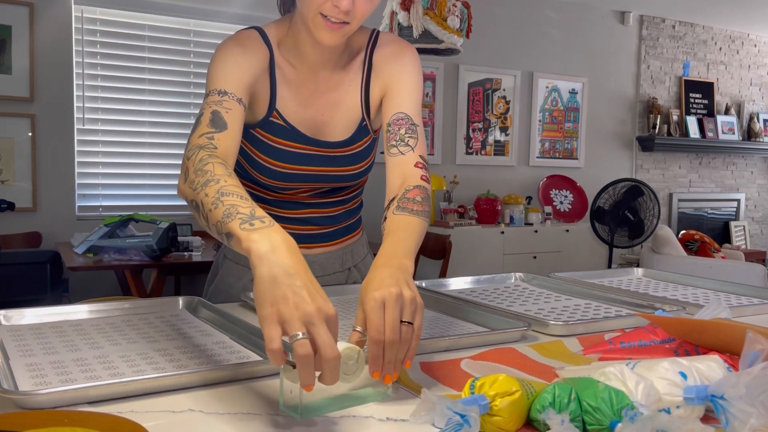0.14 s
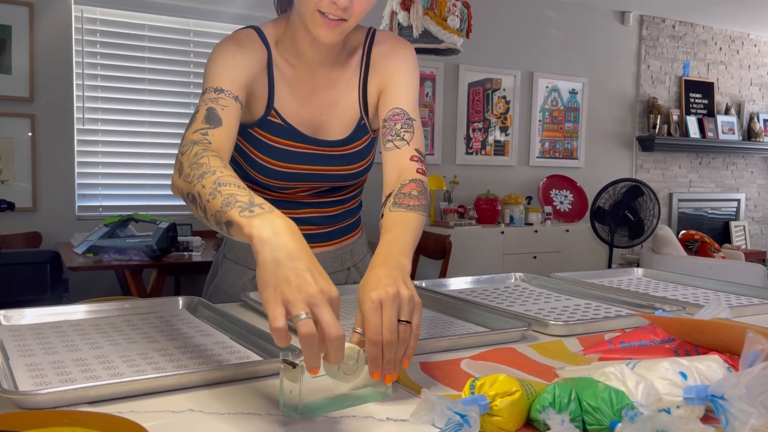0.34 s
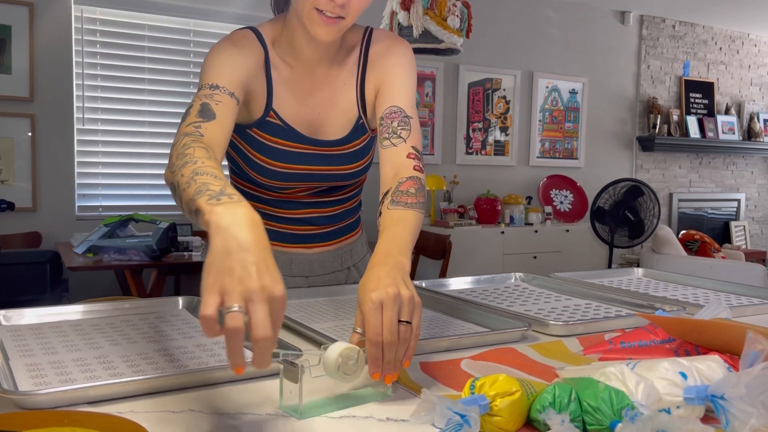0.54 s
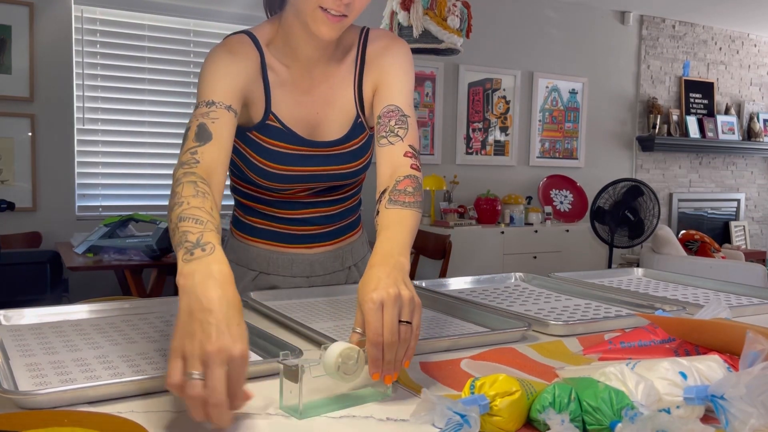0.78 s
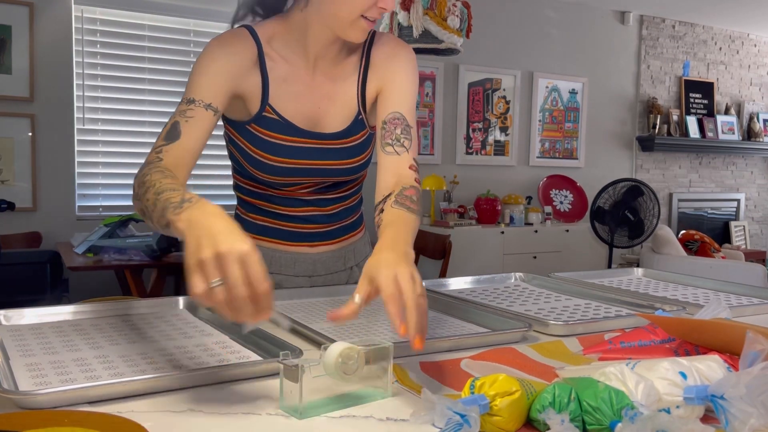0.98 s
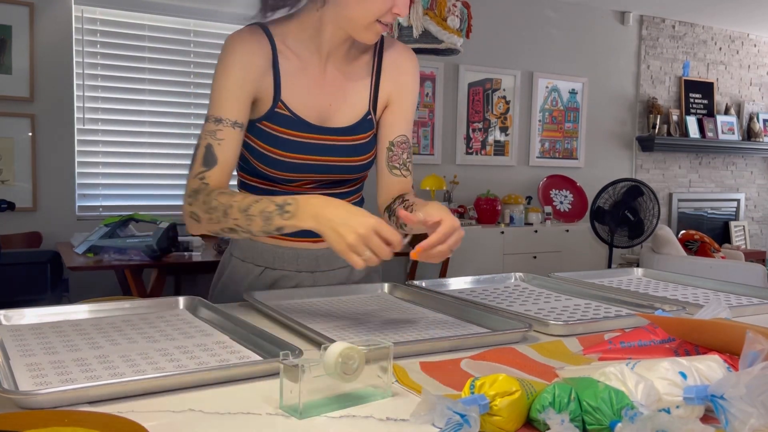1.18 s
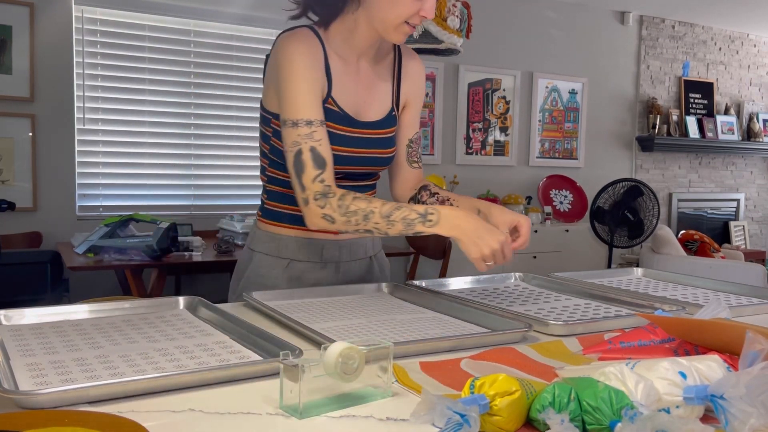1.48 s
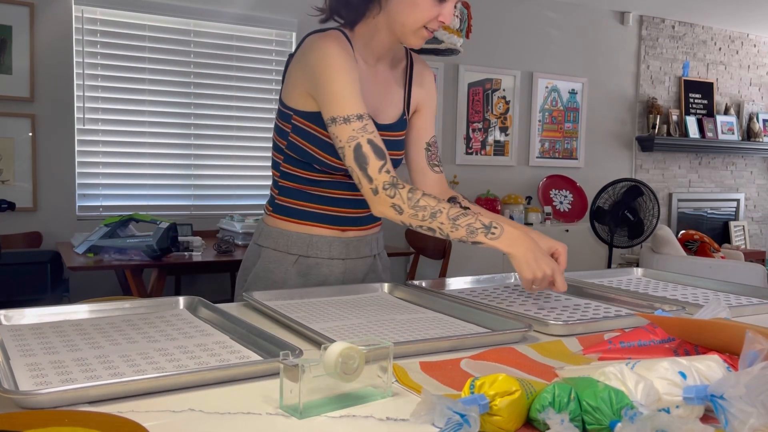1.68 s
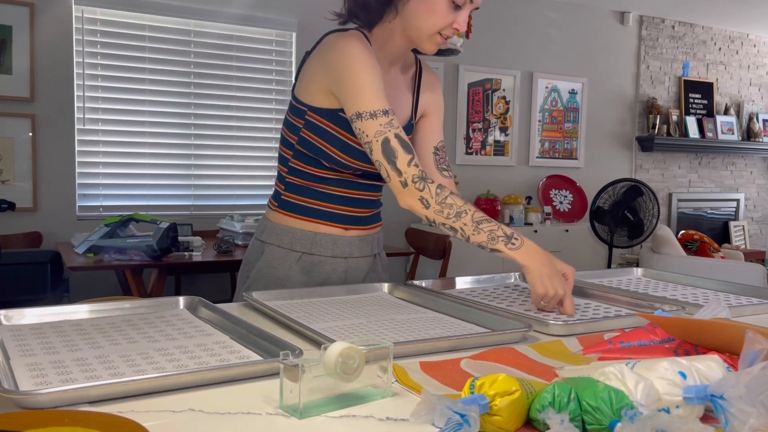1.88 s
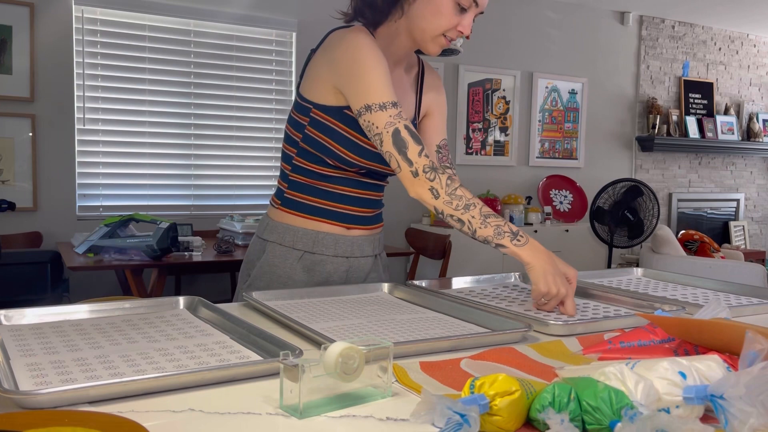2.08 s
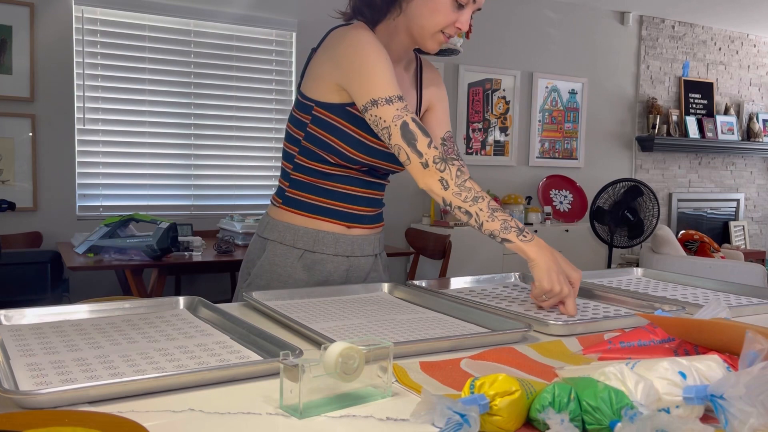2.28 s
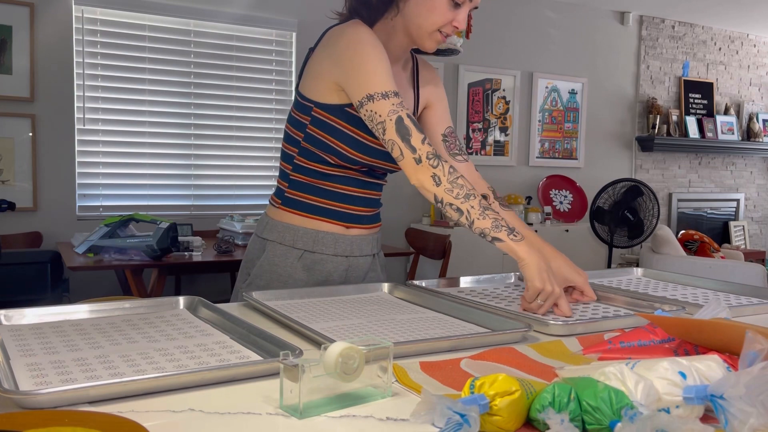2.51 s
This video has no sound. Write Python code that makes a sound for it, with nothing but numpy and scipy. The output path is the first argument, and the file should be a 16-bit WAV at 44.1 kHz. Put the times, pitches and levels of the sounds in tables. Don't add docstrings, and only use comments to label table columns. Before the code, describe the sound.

Adhesive tape is pulled from a plastic dispenser with sharp clicks and a crackly tear, then lightly handled and pressed onto metal baking sheets; a kitchen hums steadily, and nearby stereo microphones catch some room echo.

```python
import sys
import numpy as np
from scipy import signal
from scipy.fft import rfft, irfft, next_fast_len
from scipy.io import wavfile

SR = 44100
rng = np.random.default_rng(int(sys.argv[2]) if len(sys.argv) > 2 else 0)


def attenuation_scalar(level_db):
    decades = np.asarray(level_db, float) / 20
    return 10 ** decades


def transcribe(u):
    v = np.clip(np.atleast_2d(u).T, -1, 1)
    q = np.round(v * 32767).astype(np.int16)
    wavfile.write(sys.argv[1], SR, q)


N = 116865
SIZE = next_fast_len(N + SR)
HZ = np.maximum(np.arange(SIZE // 2 + 1) * SR / SIZE, 1)
AIR_LOW_HZ, AIR_HIGH_HZ = 12600, 16400


def rms_one(x):
    return x / np.sqrt(np.mean(x ** 2) + 1e-20)


def at_hz(points):
    hz, value = np.transpose(points)
    return np.interp(np.log(HZ), np.log(np.maximum(hz, 1)), value)


def ring(clicks, hz, t60_s):
    r, w = attenuation_scalar(-60 / (t60_s * SR)), 2 * np.pi * hz / SR
    return signal.lfilter([0, np.sin(w)], [1, -2 * r * np.cos(w), r * r], clicks + 1e-18)


def peak(x, hz, width_hz):
    r = np.exp(-np.pi * width_hz / SR)
    poles = [1, -2 * r * np.cos(2 * np.pi * hz / SR), r * r]
    return signal.lfilter([(1 - r * r) / 2, 0, (r * r - 1) / 2], poles, x)


def filtered(x, order, hz, kind):
    return signal.sosfilt(signal.butter(order, hz, kind, fs=SR, output="sos"), x)


def pair(alike, count):
    mid, side = rfft(rng.standard_normal((2, count)), SIZE)
    alike = np.clip(alike, 0, 1)
    return np.sqrt(1 + alike) * mid + np.sqrt(1 - alike) * side * [[1], [-1]]


def appliances():
    # f/Hz, level/dB, wander/dB
    motor_lines = [(58.9, -50.5, 1.54), (118.8, -54.5, 1), (479, -66.5, 0.5)]
    # f/Hz, width/Hz, level/dB
    ducts = [(118.3, 16, -52.5), (142.6, 7.56, -62.5), (175.3, 14, -61.5), (189.3, 5.1, -61.5),
             (250.2, 16, -62.5), (118, 23, -62.5)]
    # f/Hz, level/dB
    rumble = [(15, -35), (25, -3), (49, -6), (123, -9.5), (300, -13), (476, -15.5), (528, -16.5),
              (718, -16.5), (1500, -23), (1950, -84.5), (3300, -120)]
    # f/Hz, level/dB
    hiss = [(700, -19), (1500, 6.5), (3000, -1.5), (6000, -12), (8500, -7.5), (10000, -4.5), (11000, -33),
            (13000, -57)]
    # f/Hz, likeness/1
    likeness = [(30, 0.49), (125, 0.81), (300, 0.8), (600, 0.22), (2000, 0.265), (5000, .7), (9000, 1),
                (14000, 1)]
    rumble_db, hiss_db = -56, -69.5
    rumble_shape = attenuation_scalar(at_hz(rumble)) / (1 + (HZ / 1500) ** 2) / (1 + (44 / HZ) ** 6)
    hiss_shape = attenuation_scalar(at_hz(hiss)) / (1 + (700 / HZ) ** 2)
    shapes = [(rumble_db, rumble_shape), (hiss_db, hiss_shape)]
    shapes += [(db, 1 / (1 + (2 * (HZ - hz) / width_hz) ** 2)) for hz, width_hz, db in ducts]
    power = sum((attenuation_scalar(db) * s / np.sqrt(np.mean(s ** 2))) ** 2 for db, s in shapes)
    noise = np.sqrt(power / 2) * pair(at_hz(likeness), count=SIZE)
    t = np.arange(SIZE) / SR
    lines = 0
    for hz, db, wander_db in motor_lines:
        wander = rms_one(peak(rng.standard_normal(SIZE), 5.6, 4.6))
        lines = lines + attenuation_scalar(db + wander_db * wander) * 2 ** .5 * np.sin(2 * np.pi * hz * t)
    return noise + rfft(lines)


def kitchen(x):
    # t/s, level/dB
    echoes = [(.0015, -17), (.0024, -13), (.0036, -14.5), (.0055, -12.5)]
    # f/Hz, t60/s
    room_t60 = [(400, 0.38), (1500, 0.41), (4000, 0.39), (9000, 0.36), (11500, 0.083)]
    # f/Hz, likeness/1
    room_alike = [(400, .2), (2000, .3), (5000, .3), (8000, .75), (10000, .9)]
    away_s, away_wet_db = 1.19, 5.5
    onset_s, top_hz = 0.0006, 10900
    room_db, low_db, turn_hz = -6.5, -2.5, 3020
    noise = irfft(pair(at_hz(room_alike), count=N), SIZE)[:, :N]
    hz, t60_s = np.transpose(room_t60)
    fed = x * attenuation_scalar(away_wet_db * (np.arange(N) > away_s * SR))
    rise = np.exp(-1 / (onset_s * SR))
    tail = 0
    for k, low in enumerate(250 * 2 ** np.arange(0, 5.6, 1 / 3)):
        band = [low, low * 2 ** (1 / 3)]
        drain = attenuation_scalar(-120 / (SR * np.interp(np.log(low), np.log(hz), t60_s)))
        poles = np.convolve([1, -drain], [1, -rise])
        energy = signal.lfilter([(1 - drain) * (1 - rise)], poles, filtered(fed, 2, band, "band") ** 2 + 1e-18)
        tail = tail + (-1) ** k * np.sqrt(np.abs(energy)) * rms_one(filtered(noise, 2, band, "band"))
    near = 1 + sum(attenuation_scalar(db) * np.exp(-2j * np.pi * HZ * s) for s, db in echoes)
    wet = attenuation_scalar(room_db + low_db / (1 + (HZ / turn_hz) ** 2)) / np.sqrt(1 + (HZ / top_hz) ** 44)
    return near * rfft(x, SIZE) + wet * rfft(tail, SIZE)


def rips():
    # t/s, level/dB, length/s
    glue_rips = [
        (.2155, -63, .008),
        (.367, -52, .002),
        (.747, -48, 0.057),
        (.969, -67, 0.013),
        (1.409, -70, 0.0035),
        (1.482, -65, .005),
        (2.169, -53.5, 0.0028),
        (2.379, -64, .003),
    ]
    t = np.arange(N) / SR
    shape = 0
    for s, db, length_s in glue_rips:
        fade_db = 10 * np.maximum(t - s, 0) / length_s
        shape = shape + attenuation_scalar(db - fade_db) * (t > s) * (t < s + length_s * 1.5)
    return shape * rms_one(filtered(rng.standard_normal(N), 3, [AIR_LOW_HZ, AIR_HIGH_HZ], "band"))


def thuds():
    thud_s = [.053, .053, .090, .145, .216, .216, .275, .280, .280, .307, .309, .373, .3745, .375, .600,
              .611, .615, .616, .750, .7535, .7672, .770, .772, .9705, 1.413, 1.483, 1.487, 2.169, 2.1735,
              2.181]
    # level/dB, f/Hz, t60/s
    thud_modes = [(-42, 970, 0.034), (-48, 2500, .02), (-46, 1180, 0.05), (-42, 860, 0.04),
                  (-40.5, 4800, 0.039), (-45, 970, 0.035), (-34.5, 985, .03), (-34, 4800, .04),
                  (-31.5, 2490, 0.035), (-37.5, 347, 0.04), (-33, 2100, 0.056), (-34.5, 417, .046),
                  (-36.5, 684, .04), (-35, 2500, .015), (-42, 810, 0.032), (-32.5, 179, .11),
                  (-38.5, 253, 0.11), (-39.5, 400, 0.041), (-38, 1100, 0.039), (-34, 2240, 0.062),
                  (-17, 6230, 0.0045), (-35, 108.4, .16), (-38, 307, 0.047), (-38, 5500, 0.01),
                  (-47, 1850, .02), (-38.5, 700, 0.037), (-41.5, 3540, 0.043), (-35, 2410, 0.012),
                  (-35, 4100, 0.012), (-39, 6200, 0.034)]
    t = np.arange(SR // 5) / SR
    out = np.zeros(N)
    for s, (db, hz, t60_s) in zip(thud_s, thud_modes):
        soft_start = 1 - np.exp(-t * hz)
        out[int(s * SR):][:len(t)] += attenuation_scalar(db - 60 * t / t60_s) * soft_start * np.sin(2 * np.pi * hz * t)
    return out


def contacts():
    # t/s, film/dB, body/dB, roll/dB, cluster length/s
    dispenser = [(0.051, -44, -44, -53, 0.0045), (0.07, -44.5, -67, -57, 0.0092),
                 (0.0894, -47, -45, -51, 0.0065), (0.143, -41.5, -43, -48.5, 0.0057),
                 (0.2152, -26.5, -40, -41.5, 0.005), (0.274, -18, -26.5, -26, 0.0016),
                 (0.2795, -13.5, -28, -43, 0.002), (0.281, -18.5, -41, -31, 0.007),
                 (0.3067, -23, -27, -32, 0.0031), (0.3095, -25.5, -31.5, -35, 0.0062),
                 (0.3679, -11, -34.5, -27, 0.0014), (0.37, -36, -32, -41, 0.0039),
                 (0.3748, -36, -31, -38.5, .006), (0.438, -52, -52, -49, 0.0066),
                 (0.387, -40.5, -49, -39, 0.038), (0.452, -25, -37, -37.5, 0.04),
                 (0.506, -33.5, -42, -41, .04), (0.597, -62, -56, -57, 0.008),
                 (0.614, -35.5, -42.5, -46.5, 0.0087), (0.66, -41.5, -55.5, -54.5, 0.0085),
                 (0.6867, -36, -48.5, -48, 0.0062), (0.7404, -37, -48, -43.5, 0.0022),
                 (.748, -29, -41.5, -36, 0.0022), (.7497, -18, -64, -31, 0.0049),
                 (0.7554, -19, -34.5, -35, 0.0058), (0.762, -24, -48, -45, 0.0039),
                 (0.767, -19, -42, -27.5, 0.0013), (0.7707, -21, -40, -34.5, 0.0062),
                 (0.774, -27, -41, -44, 0.0051), (.786, -32, -54, -41, 0.0027),
                 (0.801, -28, -46, -41, 0.0035), (0.804, -30, -59, -42, 0.0022)]
    # t/s, film/dB, low sheet modes/dB, high sheet modes/dB, cluster length/s
    handling = [(0.965, -34, -63, -54, 0.0028), (0.9709, -33.5, -52, -49.5, 0.0031),
                (1.161, -45.5, -64.5, -82.5, 0.069), (1.261, -50, -62, -52.5, 0.02),
                (1.4084, -72, -58, -57, 0.0025), (1.4117, -35.5, -52.5, -49, 0.0031),
                (1.426, -47, -75, -59, 0.009), (1.4815, -25, -38, -35, 0.0039),
                (1.4875, -28.5, -40.5, -39.5, .008), (1.76, -77, -74, -87.5, 0.042),
                (1.875, -50.5, -78, -62, 0.054), (1.997, -39.5, -72.5, -50, 0.024),
                (2.168, -18.5, -52, -33.5, 0.0012), (2.1735, -37.5, -51, -36.5, 0.0061),
                (2.179, -25.5, -83.5, -44, 0.027), (2.186, -45, -66, -47, 0.0068),
                (2.354, -44, -56.5, -47, 0.01), (2.356, -32, -75, -51, 0.0084),
                (2.374, -40.5, -62, -52, 0.0022), (2.439, -37.5, -63.5, -56, 0.053),
                (2.63, -71, -67.5, -83, 0.025)]
    # f/Hz, level/dB, t60/s
    body_modes = [(676, -14, 0.03), (986, -5.5, 0.036), (1215, -3.5, 0.026), (1522, -8.5, 0.023),
                  (1859, -3, 0.032), (2250, -4.5, 0.023), (2440, -3, 0.012), (2753, -3, 0.0096)]
    # f/Hz, level/dB, t60/s
    roll_modes = [(3365, -0.5, 0.0075), (4090, -6, 0.0075), (4700, -0.5, 0.0045), (4700, -5, 0.02),
                  (5130, 7, 0.0031), (6060, 1, 0.0087), (6490, 4.5, 0.0037)]
    # f/Hz, level/dB, t60/s
    sheet_low = [(674, -7.5, 0.026), (1020, -2.5, 0.027), (1355, 0.5, 0.013), (1676, -5, 0.022),
                 (2185, -5.5, 0.016), (2760, -10, 0.021)]
    # f/Hz, level/dB, t60/s
    sheet_high = [(3200, -19, 0.12), (3720, -6, 0.012), (3930, -19, 0.11), (4300, -7, 0.015),
                  (5185, -0.5, 0.024), (5520, -9, 0.056), (5700, 1.5, 0.01), (6350, 1.5, 0.0086)]
    film_db, body_db, roll_db, mode_scatter_db = 9.5, 22, 22.5, 1.7
    after_db, grain_spread_db, snap_loss_db_per_s = -4, 4.5, 886.5
    rub_s, rub_swell_db, rub_evenness = .018, 17, 0.33
    film_low_hz, body_low_hz, top_hz = 5640, 600, 11810
    port_hz, port_width_hz, port_db = 9337, 2310, 16
    rows = np.array(dispenser + handling)
    draw = rng.random((len(rows), 3, 64))
    scatter = rng.standard_normal((len(rows), 16))
    late = draw[:, 0] * (np.arange(64) > 0)
    length_s = rows[:, 4:]
    rub = length_s > rub_s
    grain_db = after_db - 16 + 14 * np.log10(np.minimum(length_s / 0.0079, 1)) - 12 * late
    grain_db -= grain_spread_db * (1 - rub_evenness * rub) * np.log(draw[:, 1] + 0.022)
    grain_db -= rub_swell_db * rub * np.maximum(1 - late / 0.39, 0)
    click_db = np.where(late > 0, grain_db, -snap_loss_db_per_s * length_s)
    click = attenuation_scalar(click_db) * np.sign(draw[:, 2] - .5)
    at = np.minimum(((rows[:, :1] + late * length_s * 2) * SR).astype(int), N - 1)

    def train(db):
        return np.bincount(at.ravel(), (click * attenuation_scalar(db)[:, None]).ravel(), N)

    def modes(table, db, first):
        out = 0
        for k, (hz, mode_db, t60_s) in enumerate(table):
            strike_db = db + mode_db + mode_scatter_db * scatter[:, first + k]
            out = out + ring(train(strike_db), hz, t60_s) * (-1) ** k
        return out

    out = filtered(train(rows[:, 1] + film_db), 2, film_low_hz, "high")
    away = np.arange(len(rows)) >= len(dispenser)
    mute_dispenser_db, mute_sheets_db = -200 * away, -200 * ~away
    low_db, high_db = rows[:, 2] + body_db - 20, rows[:, 3] + roll_db - 20
    out = out + modes(body_modes, low_db + mute_dispenser_db, first=0)
    out = out + modes(roll_modes, high_db + mute_dispenser_db, first=8)
    out = out + modes(sheet_low, low_db + mute_sheets_db, first=0)
    out = out + modes(sheet_high, high_db + mute_sheets_db, first=8)
    out = out + attenuation_scalar(port_db) * peak(peak(out, port_hz, port_width_hz * 2), port_hz, port_width_hz)
    return filtered(filtered(out, 8, top_hz, "low"), 2, body_low_hz, "high")


def scene():
    # f/Hz, level/dB
    port_balance = [(60, 3.2), (250, 2.4), (950, 3), (2400, 5.5), (5500, 5.5), (8500, 1), (12000, 0)]
    # f/Hz, phase/rad
    port_phase = [(150, 0), (700, -.3), (3100, 1.2), (6700, .4), (7750, 1.0), (8870, -.5), (10250, -3.14),
                  (11600, -5.3)]
    half = attenuation_scalar(at_hz(port_balance) / 2) * np.exp(.5j * at_hz(port_phase))
    sound = kitchen(contacts() + thuds()) + rfft(rips(), SIZE) + appliances()
    return irfft(sound * np.array([half, 1 / half]), SIZE)[:, :N]


def treble_gate(x):
    gate_hz, band_hz, gate_db, db_per_khz = 9950, 430, -94, -4
    follows, soft_db, wander_db = 0.56, 3.5, 4.5
    turn = np.array([[1, 1], [1, -1]]) / np.sqrt(2)
    hz, _, z = signal.stft(turn @ x, SR, nperseg=1024)
    power = np.abs(z) ** 2 + 1e-20
    lead_db = 10 * np.log10(power[:, (hz > 7000) & (hz < gate_hz)].mean(axis=(0, 1)))
    for low in np.arange(gate_hz, SR / 2, band_hz):
        band = (hz >= low) & (hz < low + band_hz)
        threshold_db = gate_db + follows * (lead_db + 81.5) + db_per_khz * max(low / 1000 - 12.3, 0)
        threshold_db = threshold_db + 40 * (low > AIR_HIGH_HZ)
        over_db = 10 * np.log10(power[:, band].mean(axis=1)) - threshold_db
        over_db += wander_db * np.repeat(rng.standard_normal(len(lead_db)), repeats=2)[:len(lead_db)]
        z[:, band] *= np.clip(over_db / soft_db, 0, 1)[:, None]
    return turn @ signal.istft(z, SR, nperseg=1024)[1][:, :N]


def top_cut(x):
    return signal.sosfilt(signal.butter(12, 16840, fs=SR, output="sos"), x)


def record(dry):
    mix = treble_gate(dry)
    return top_cut(mix)


dry = scene()
out = record(dry)
transcribe(out)
```